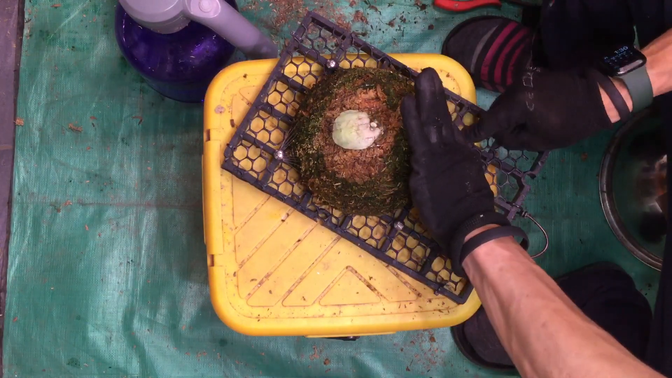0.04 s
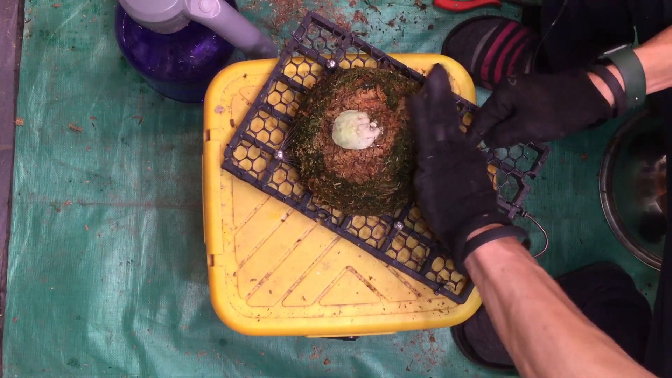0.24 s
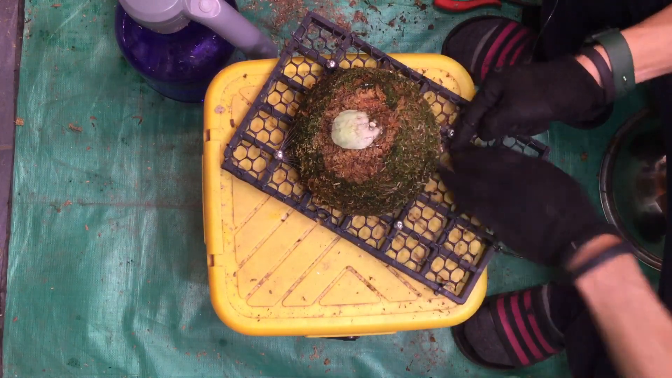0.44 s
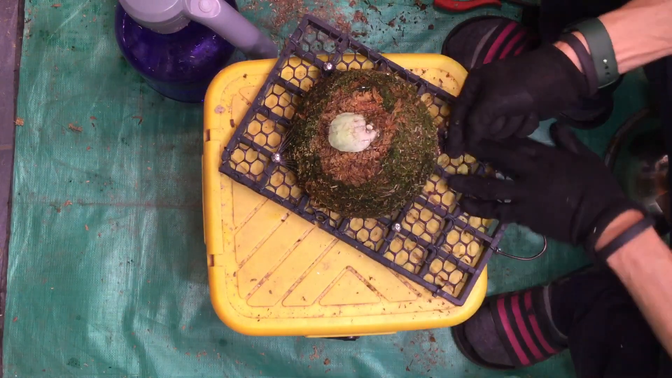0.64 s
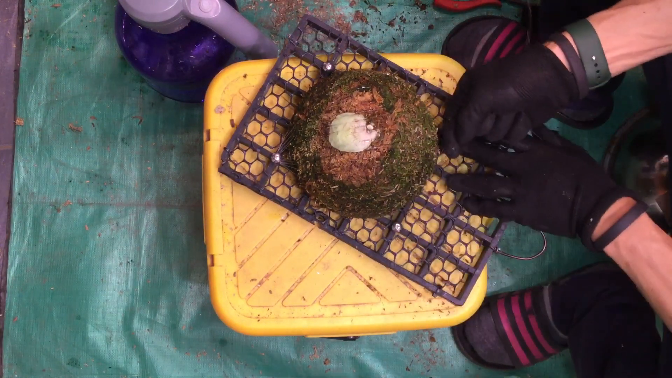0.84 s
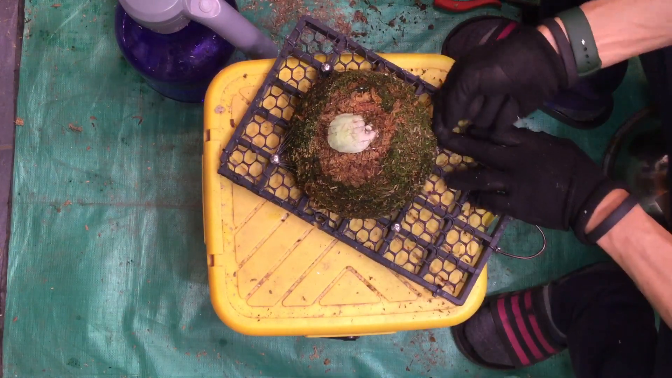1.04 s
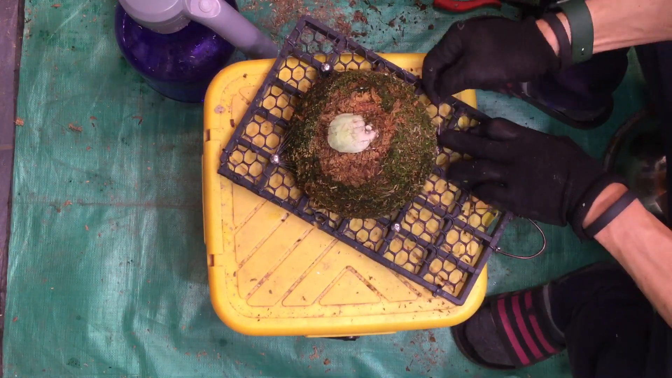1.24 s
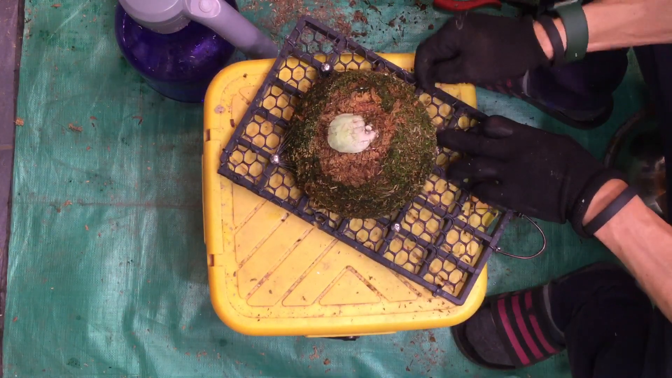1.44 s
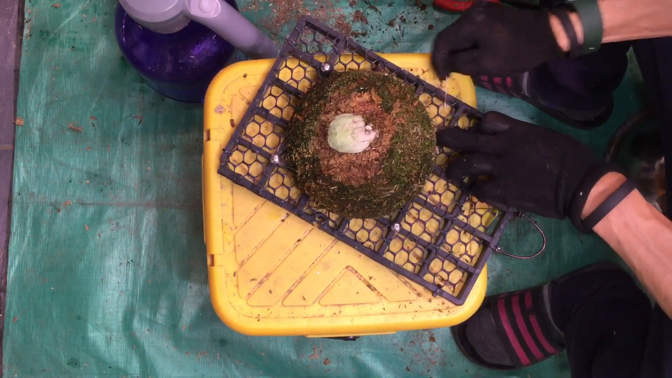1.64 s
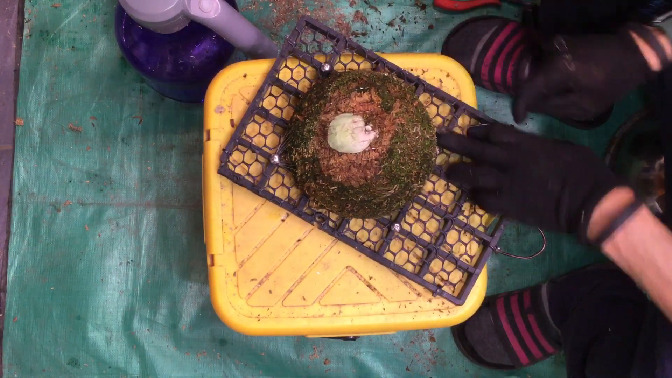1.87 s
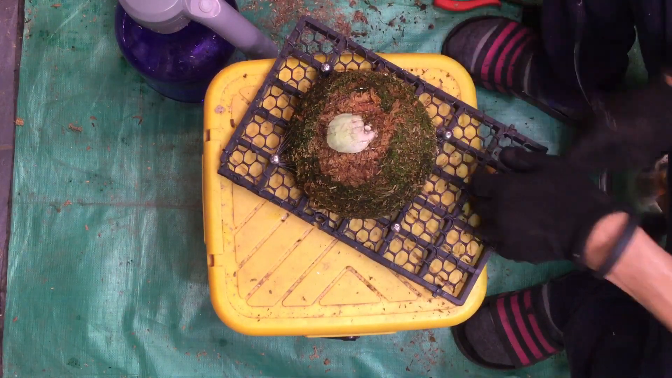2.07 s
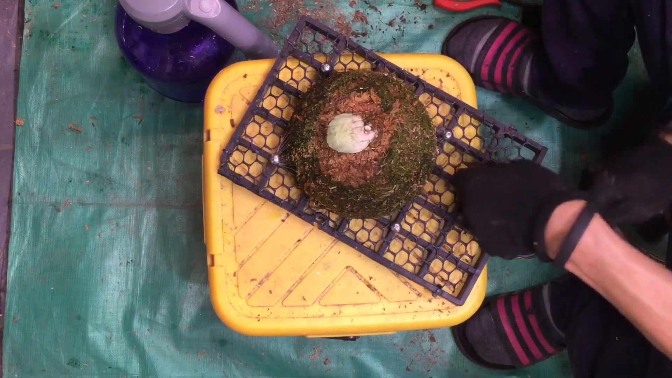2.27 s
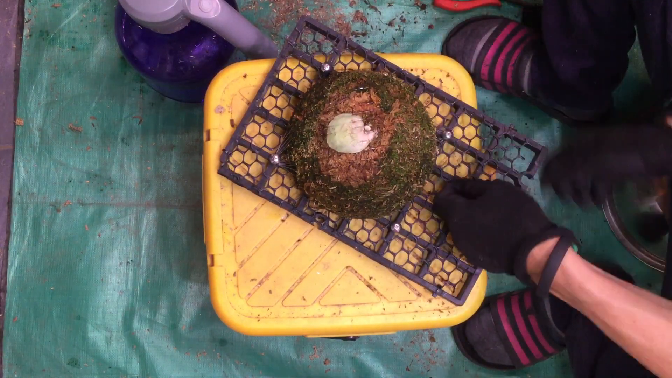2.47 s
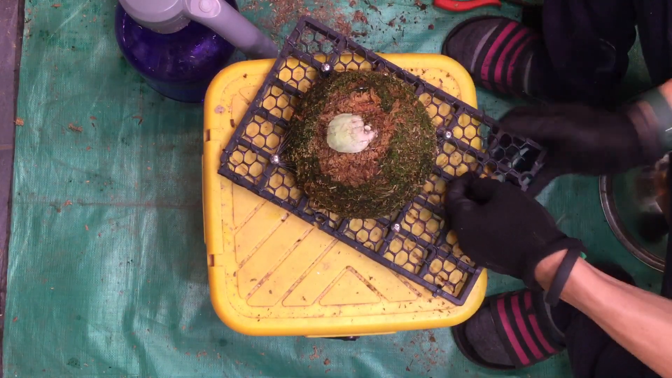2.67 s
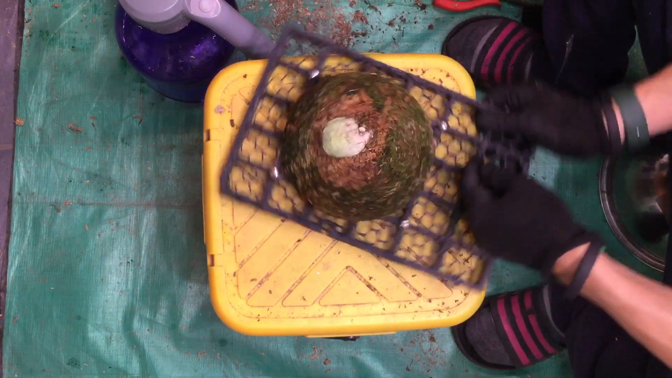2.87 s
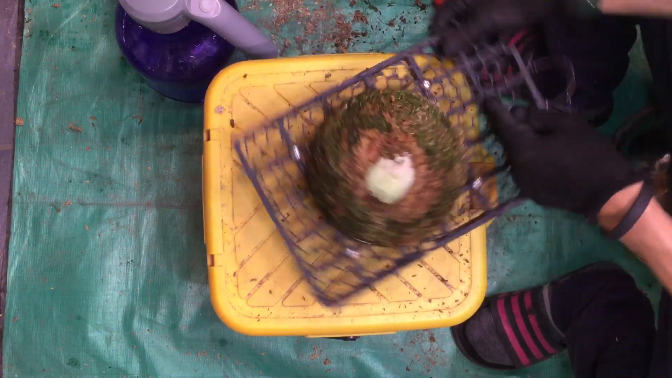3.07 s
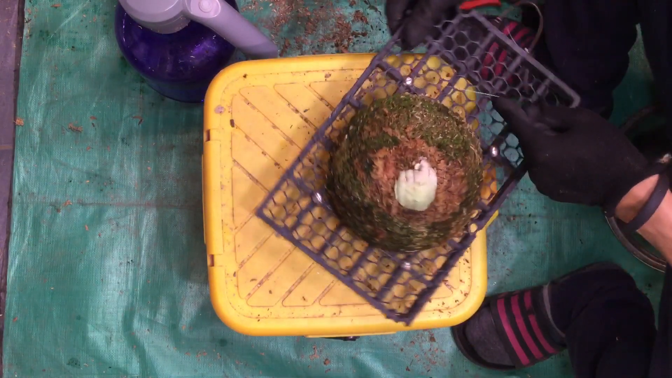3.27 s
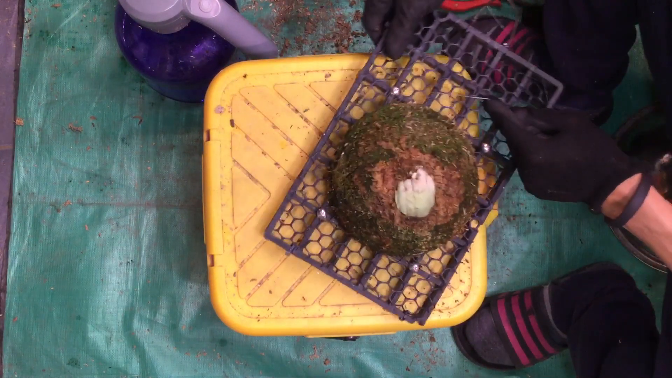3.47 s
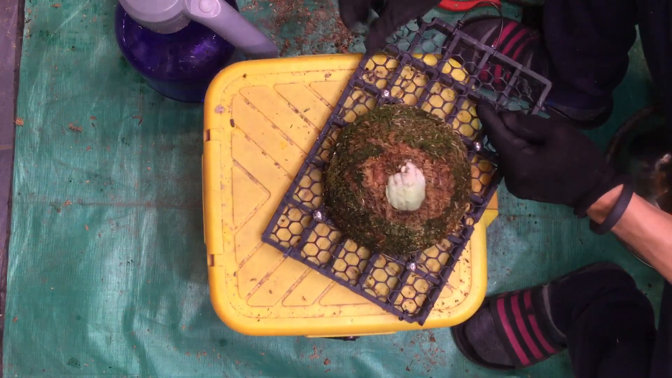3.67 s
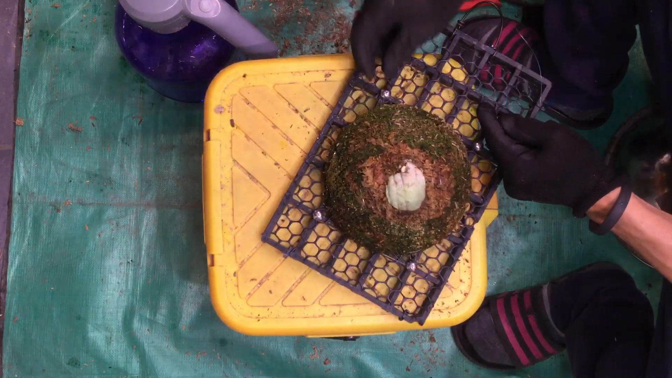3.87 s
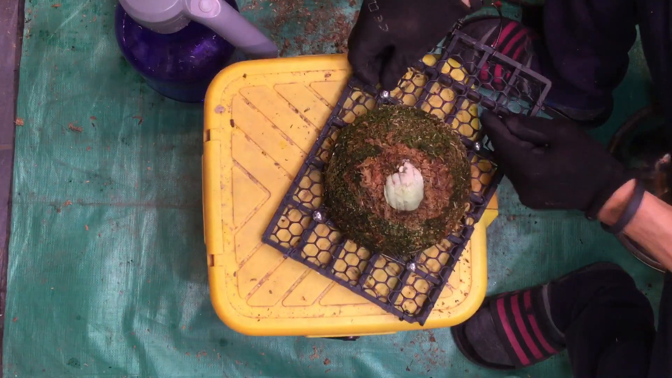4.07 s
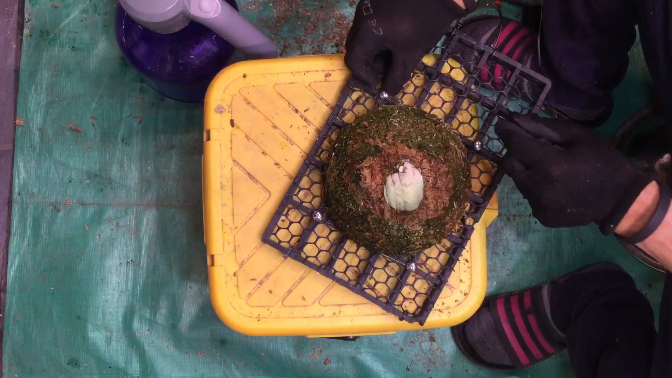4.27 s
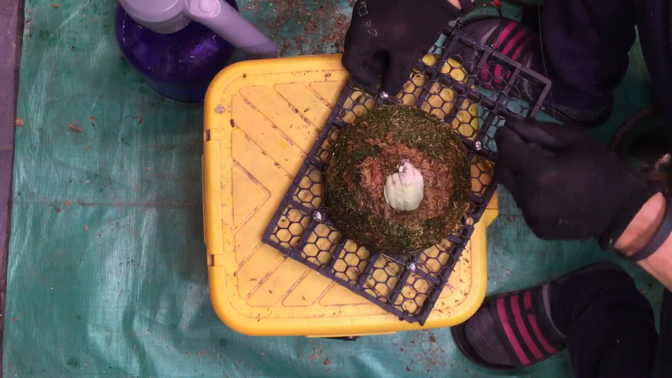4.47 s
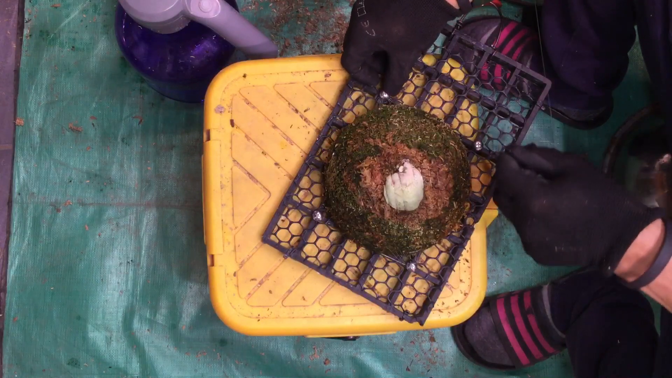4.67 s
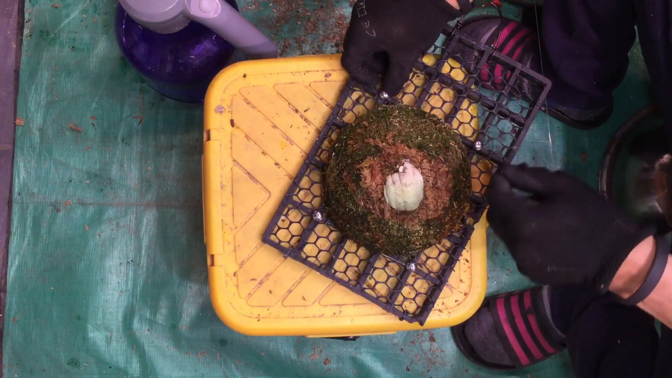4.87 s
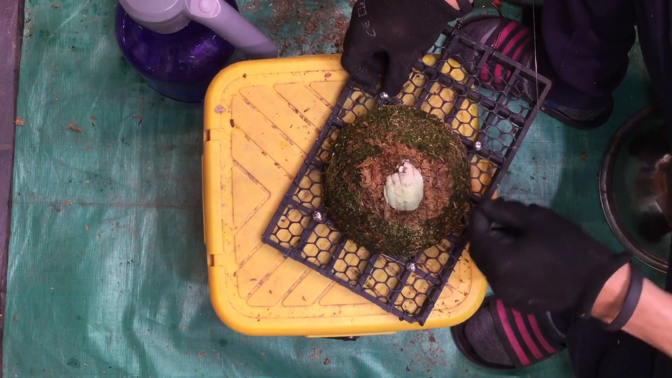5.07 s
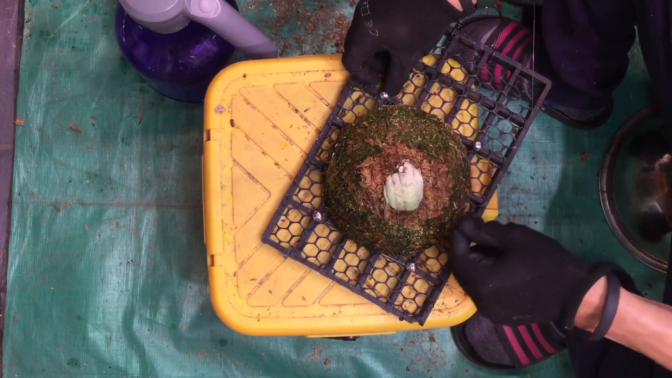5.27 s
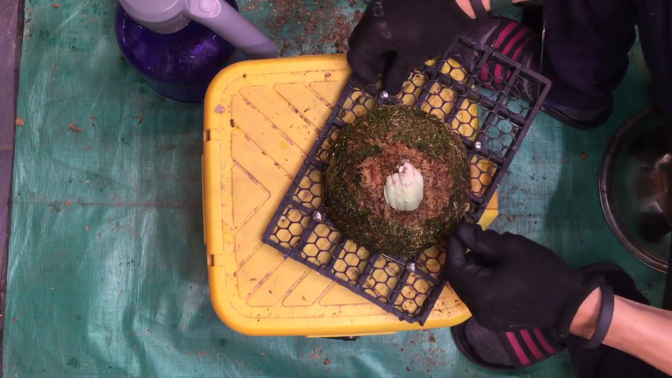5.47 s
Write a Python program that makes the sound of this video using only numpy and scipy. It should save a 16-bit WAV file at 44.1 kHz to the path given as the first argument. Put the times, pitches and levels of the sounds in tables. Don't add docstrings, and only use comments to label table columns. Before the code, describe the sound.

Close, dry recording in a small damped room. A plastic grid board rubs and bumps softly on a hollow tub lid, a few sharp clips click, then more light knocks and glove rubs follow. After three seconds come hard, boomy clunks as the board is turned and dropped, the heaviest at four seconds. One late click and tiny ticks remain over low ventilation rumble and wavering hum.

```python
import sys
import numpy as np
from scipy import signal
from scipy.fft import rfft, irfft
from scipy.io import wavfile

SR = 44100
rng = np.random.default_rng(int(sys.argv[2]) if len(sys.argv) > 2 else 0)


def level_to_linear(level):
    exponent = np.asarray(level, float) / 20
    return 10 ** exponent


def unload_audio(sound):
    columns = np.transpose(np.atleast_2d(sound))
    steps = np.round(np.clip(columns, -1, 1) * 32767)
    wavfile.write(sys.argv[1], SR, steps.astype(np.int16))


N = 242991

# (frequency [Hz], density [dB per Hz])
AIR_SPECTRUM = [(12, -59), (20, -17), (124, -1.5), (205, -1.5), (279, -10), (463, -9), (532, -16),
                (596, -12.5), (811, -20), (1070, -18.5), (1730, -25), (2420, -28.5), (7230, -42.5),
                (13800, -46), (16300, -47)]
# (frequency [Hz], width [Hz], level [dB rms])
DUCTS = [(587, 3.9, -67), (1079.6, 11.3, -69), (1350, 23, -71.5), (1567, 28, -79), (2417, 24, -77),
         (3487, 51, -83)]
# (time [s], level [dB])
HUM_SWELLS = [(.6, -63), (1.18, -59.5), (1.73, -68), (2.46, -54.5), (2.85, -52), (3.1, -52.5),
              (3.66, -45.5), (3.911, -50.5), (4.26, -56), (4.549, -49), (4.85, -49), (5.17, -54.5),
              (5.4, -51.5)]
AIR_DB, HUM_DB, HUM_HZ = -55.5, -64, 124.3
SWELL_RISE_S, SWELL_FALL_S = 0.21, 0.14

# (peak time [s], rise [s], fall [s], hiss level [dB])
GLOVE_STROKES = [(.238, .1, .03, -94), (.496, 0.041, .06, -87), (.608, 0.12, 0.19, -78.5),
                 (1.4, .2, 0.45, -103), (1.5, 0.049, 0.04, -71.5), (1.6, .2, .03, -89),
                 (1.874, 0.042, 0.064, -81.5), (2.028, 0.18, 0.028, -80), (2.474, 0.1, 0.063, -82),
                 (2.608, 0.078, 0.031, -78), (2.75, 0.068, 0.12, -84.5), (2.87, 0.11, .05, -92),
                 (2.91, 0.12, 0.059, -77.5), (3.09, 0.18, 0.18, -85), (3.582, 0.067, 0.16, -81.5)]
# (time [s], peak [dB])
GLOVE_TICKS = [(1.476, -65), (1.4875, -58), (1.6766, -56), (2.4618, -72), (2.7207, -64), (2.8689, -75),
               (3.5808, -62), (4.6942, -70), (4.7531, -63), (4.8953, -66), (4.9094, -67), (4.9352, -67),
               (4.9444, -64), (4.9736, -63), (5.021, -61), (5.0814, -65), (5.1098, -65), (5.1627, -70),
               (5.2415, -70), (5.4001, -68), (5.4834, -70)]
# (frequency [Hz], density [dB per Hz])
HISS_SPECTRUM = [(600, 11), (1200, 2.5), (3000, -2.5), (6000, -7), (10000, -12), (15500, -9), (16200, -44)]

# (peak time [s], rise [s], fall [s], level [dB])
DRAGS = [(.266, 0.085, 0.23, -55.5), (.45, .2, 0.11, -57), (.594, 0.11, 0.058, -37),
         (1.508, 0.043, 0.1, -43.5), (1.65, 0.13, 0.061, -43.5), (1.908, 0.28, .03, -49),
         (2.178, .22, 0.018, -48.5), (2.776, 0.023, 0.54, -39), (2.98, 0.78, 0.18, -49.5),
         (3.166, 0.14, .5, -49), (3.632, .14, .06, -39)]
# (time [s], main boom [dB], upper boom [dB rel], deep boom [dB rel])
LANDINGS = [
    (0.469, -37, -12, -1.5),
    (0.568, -44.5, -36, -28),
    (0.706, -35.5, -7, -21),
    (1.935, -33.5, -12, -9),
    (2.764, -40.5, -15, -16),
    (3.479, -18.5, -8, -48),
    (4.002, -24.5, -38, -3),
    (4.0143, -15.5, -16.5, -29),
    (4.109, -39, -7, -2.5),
]
# (time [s], main boom [dB], upper boom [dB rel], deep boom [dB rel])
PRESSES = [(0.722, -28, -38, -1), (2.008, -33, -3, -21), (2.046, -37.5, -7, -7), (2.581, -31, -15.5, -15),
           (2.604, -36.5, -24, -1), (3.497, -55, -25, -22), (3.609, -40, -10, -12), (3.671, -23, -6, -13),
           (3.685, -15.5, -10.5, -7), (3.717, -30.5, -22, 1), (3.746, -35, -12, 1),
           (4.006, -34.5, -19, 5.5), (4.082, -30.5, -11, -14)]
# (time [s], main boom [dB])
NUDGES = [(0.751, -44.5), (1.501, -42), (1.542, -47), (1.588, -53), (1.61, -44.5), (1.634, -44),
          (1.952, -46.5), (2.124, -46.5), (2.422, -50.5), (2.84, -39.5), (2.89, -41), (2.998, -43.5),
          (3.029, -43.5), (3.522, -36.5)]
NUDGE_UPPER_DB, NUDGE_DEEP_DB = -9, 0.5
FREE_RING, PRESSED_RING, NUDGED_RING = 0.73, 0.67, 1
# (frequency [Hz], level [dB], t60 [s])
LID_MAIN_MODES = [(177.8, 2.5, 0.14), (188, -11, 0.34), (171, -13, 0.23)]
# (frequency [Hz], level [dB], t60 [s])
LID_UPPER_MODES = [(274.7, -4.5, 0.35), (241, 10, 0.096), (313.5, 0, 0.2)]
# (frequency [Hz], level [dB], t60 [s])
LID_DEEP_MODES = [(110.8, 10.5, 0.17), (137, 13, 0.017), (66, -19, 0.87)]

# (time [s], body [dB], body pitch [Hz], edge [dB rel], snap [dB rel])
KNOCKS = [(0.298, -60, 1050, 0, 9), (0.467, -43, 620, -22, -27), (0.697, -41.5, 900, -21, -38),
          (0.701, -34, 663, -31, -40), (1.502, -48, 694, -14, -13), (1.874, -69, 1020, -22, -17),
          (2.004, -31, 1060, -14, -27), (2.03, -39.5, 680, -17, -28), (2.606, -54.5, 670, -20, 7.5),
          (3.4745, -23, 1300, -7.5, -11), (3.4768, -18, 857, -16, -45), (3.588, -54, 657, -2, -15),
          (3.67, -24.5, 670, -3.5, -33), (3.677, -21, 956, -32, -28), (3.699, -29, 705, -14.5, -35),
          (3.996, -47, 920, -7, -35), (4.005, -32, 1190, -19, -45), (4.011, -32.5, 695, -6, -21),
          (5.437, -54.5, 1090, -5, 3)]
# (time [s], body [dB], body pitch [Hz], edge [dB rel], snap [dB rel])
TAPS = [(0.697, -40, 1160, -29, -38), (1.929, -26, 1410, -9, -21), (1.938, -35, 1370, -37, 9),
        (1.955, -42, 1410, -18, -20), (2.907, -38, 1950, -32, -3), (2.911, -41.5, 1290, -9, -20),
        (3.124, -50, 1350, -32, 2.5), (3.492, -30, 1480, -31, -37), (3.667, -19, 1315, -12, -38),
        (4.018, -37.5, 1770, -16, -38), (4.029, -47, 1450, -8, -18), (4.083, -44, 1070, -5.5, -26),
        (2.912, -43, 660, -20, -30)]
GRID_MODES_HZ = np.geomspace(330, 2600, 26)
KNOCK_S, TAP_S = 0.0082, 0.0026
LEAD_S = 0.015

# (time [s], peak [dB], snap [dB rel], rattle [dB rel])
CLICKS = [
    (1.6076, -42, -17, -12.5),
    (1.6646, -55, -12, -7.5),
    (1.688, -33, -7, -9),
    (1.758, -31, -11, -8),
    (4.2089, -39.5, -14, -8.5),
]
# (frequency [Hz], level [dB], t60 [s])
CLICK_RATTLES = [
    [(6850, -4, 0.036), (2940, -5, .04), (1440, 5, 0.029)],
    [(2940, 6, 0.23), (4100, -5, .1)],
    [(3000, -5.5, 0.26), (3500, -15, .06), (1780, -11, 0.045), (3660, -2, 0.033), (5400, -13, 0.26),
     (6700, -10, 0.12), (8600, -6, 0.027)],
    [(3580, -1.5, 0.045), (1620, -11.5, 0.12), (2930, -5, 0.046), (4800, -23, 0.17), (6450, -7.5, 0.11),
     (8400, -27, 0.086)],
    [(4230, 3.5, 0.045), (5700, -4, 0.016), (3300, -6, 0.07)],
]

# (frequency [Hz], t60 [s])
ROOM_T60 = [(200, 0.27), (1000, 0.16), (4000, 0.14), (14000, 0.067)]
ROOM_DB = -7.5


def rms_one(x):
    return x / np.sqrt(np.mean(x ** 2) + 1e-20)


def peak_one(x):
    return x / abs(x).max()


def at_hz(points, hz):
    points_hz, values = np.array(points).T
    return np.interp(np.log(hz), np.log(points_hz), values)


def band(x, low_hz, high_hz):
    sos = signal.butter(2, [low_hz, min(high_hz, 0.45 * SR)], "band", fs=SR, output="sos")
    return signal.sosfilt(sos, x)


def drift(rate_hz):
    knots = rng.standard_normal(400)
    return np.interp(np.arange(N) / SR * rate_hz, np.arange(400), knots)


def coloured(spectrum, patchy_db):
    hz = np.maximum(np.fft.rfftfreq(N, 1 / SR), 10)
    shaped = rfft(rng.standard_normal(N)) * level_to_linear(at_hz(spectrum, hz))
    octave = np.log2(hz / 30)
    out = np.zeros(N)
    for k in range(-2, 11):
        share = np.clip(1 - abs(octave - k), 0, 1)
        out += level_to_linear(patchy_db * drift(18.0)) * irfft(shaped * share, N)
    return out


def gestures(rows):
    t = np.arange(0, N + 16, 16) / SR
    level = np.zeros(len(t))
    for s, rise_s, fall_s, peak_db in rows:
        level += level_to_linear(peak_db - 20 * np.maximum((s - t) / rise_s, (t - s) / fall_s))
    return np.interp(np.arange(N) / SR, t, level)


def ring(force, hz, t60_s):
    r = level_to_linear(-60 / (max(t60_s, 0.003) * SR))
    w = 2 * np.pi * hz / SR
    return signal.lfilter([0, np.sin(w)], [1, -2 * r * np.cos(w), r * r], force + 1e-18)


def strike(times_s, levels_db, freedom, modes):
    out = np.zeros(N + SR)
    t = np.arange(SR // 2) / SR
    for s, level_db, free in zip(times_s, levels_db, np.clip(freedom, 0.2, 3)):
        start = int(s * SR)
        for k, (hz, mode_db, t60_s) in enumerate(modes):
            wave = level_to_linear(level_db + mode_db - 60 * t / (t60_s * free)) * np.sin(2 * np.pi * hz * t)
            out[start:start + len(t)] += wave * (-1) ** k
    return out[:N]


def contact(grit, length_s, graze_db):
    t = np.arange(len(grit)) / SR - LEAD_S
    after = np.exp(-np.maximum(t, 0) / np.clip(length_s, 0.0002, 0.03)) * (t >= 0)
    before = level_to_linear(graze_db) * np.exp(np.minimum(t, 0) / 0.0085) * (t < 0)
    burst = grit * (after + before)
    burst[int(LEAD_S * SR) + 1] = 6.9
    return burst


def ventilation():
    air = coloured(AIR_SPECTRUM, patchy_db=0.6)
    air = signal.sosfilt(signal.cheby2(12, 40, 16000, fs=SR, output="sos"), air)
    out = level_to_linear(AIR_DB - 1.0) * air / np.std(band(air, 205, 16000))
    for hz, width_hz, level_db in DUCTS:
        t60_s = np.log(1000) / np.pi / width_hz
        waver = level_to_linear(level_db - 0.6 + 1.5 * drift(9.0))
        out += waver * rms_one(ring(rng.standard_normal(N), hz, t60_s))
    phase = 2 * np.pi * np.cumsum(HUM_HZ + 7.0 * drift(15.0)) / SR
    swells = gestures([(s, SWELL_RISE_S, SWELL_FALL_S, db) for s, db in HUM_SWELLS])
    load = level_to_linear(HUM_DB) + swells
    hum = level_to_linear(0.5) * load * level_to_linear(2.6 * drift(21.054)) * np.sin(phase)
    return out + hum


def gloves():
    catches = np.repeat(rng.exponential(1, N // 90 + 1), 90)[:N]
    slips = rng.exponential(1, N)
    grain = level_to_linear(1.3 * np.minimum(slips, 5) + 1.2 * np.minimum(catches, 4))
    hiss = coloured(HISS_SPECTRUM, patchy_db=1.0) * grain
    hiss = hiss / np.std(band(hiss, 7360, 14000))
    s, peak_db = np.transpose(GLOVE_TICKS)
    ticks = np.zeros(N)
    ticks[(s * SR).astype(int)] = level_to_linear(peak_db + 3)
    decay = np.exp(-1 / (0.002 * SR))
    smear = signal.lfilter([1], [1, -decay], ticks) * rng.standard_normal(N)
    return level_to_linear(7.0) * gestures(GLOVE_STROKES) * hiss + band(smear, 8900, 16000)


def lid():
    nudges = [(s, db, NUDGE_UPPER_DB, NUDGE_DEEP_DB) for s, db in NUDGES]
    heard_s, main_db, upper_db, deep_db = np.transpose(LANDINGS + PRESSES + nudges)
    counts = [len(LANDINGS), len(PRESSES), len(NUDGES)]
    freedom = np.repeat([FREE_RING, PRESSED_RING, NUDGED_RING], counts)
    push_s = heard_s - 0.004
    boom = strike(push_s, main_db + 0.5, freedom, LID_MAIN_MODES)
    boom += strike(push_s, main_db + upper_db - 3, freedom, LID_UPPER_MODES)
    deep = strike(push_s, main_db + deep_db - 9, freedom, LID_DEEP_MODES)
    drag = np.zeros(N)
    for hz, db, t60_s in LID_MAIN_MODES:
        drag += level_to_linear(db) * ring(rng.standard_normal(N), hz, t60_s)
    drag = level_to_linear(-5.0) * gestures(DRAGS) * rms_one(drag)
    return band(boom, 89, 670) + band(deep, 34, 183) + drag


def grid():
    hits = [(*row, KNOCK_S) for row in KNOCKS] + [(*row, TAP_S) for row in TAPS]
    size = (len(hits), 4000)
    grit = rng.standard_normal(size) * level_to_linear(2.0 * rng.standard_normal(size))
    coupling = rng.standard_normal((len(hits), len(GRID_MODES_HZ)))
    sounds = []
    for row, pull, (s, body_db, body_hz, edge_db, snap_db, length_s) in zip(grit, coupling, hits):
        gains = pull * level_to_linear(-24 * np.log2(GRID_MODES_HZ / body_hz) ** 2)
        touch = contact(row, 0.52 * length_s, -56)
        side_modes = sum(g * ring(touch, hz, 16 / hz) for g, hz in zip(gains, GRID_MODES_HZ))
        firm = contact(0.033 * row, 0.23 * length_s, -60)
        main_mode = ring(firm, body_hz, 16 / body_hz)
        body = peak_one(main_mode) + level_to_linear(-10) * peak_one(side_modes)
        body = signal.sosfilt(signal.butter(2, 2800, fs=SR, output="sos"), body)
        burst = contact(row, length_s, -17.5)
        edge = level_to_linear(edge_db + 4.5) * peak_one(band(burst, 1600, 4000))
        snap = level_to_linear(snap_db - 3) * peak_one(band(burst, 4200, 11500))
        sounds.append((s - LEAD_S, level_to_linear(body_db) * (peak_one(body) + edge + snap)))
    return sounds


def clip_clicks():
    sounds = []
    grit = rng.standard_normal((len(CLICKS), 5500))
    for row, (s, peak_db, snap_db, rattle_db), modes in zip(grit, CLICKS, CLICK_RATTLES):
        crack = peak_one(band(contact(row, 0.002, -24), 1200, 8000))
        rattle = np.zeros(len(row))
        for hz, db, t60_s in modes:
            rattle += level_to_linear(db) * peak_one(ring(contact(row, t60_s / 7, -26), hz, 0.008))
        snap = level_to_linear(snap_db + 1) * peak_one(band(contact(row, 0.0038, -32), 8300, 13300))
        sounds.append((s - LEAD_S, level_to_linear(peak_db + 3.5) * (crack + level_to_linear(rattle_db) * rattle + snap)))
    return sounds


def room(sounds):
    out = np.zeros(N + SR)
    t = np.arange(int(0.3 * SR)) / SR
    edges_hz = 250 * 2 ** np.arange(0, 6.6, 0.5)
    fields = [band(rng.standard_normal(SR), lo, hi) for lo, hi in zip(edges_hz, edges_hz[1:])]
    decays = [level_to_linear(-60 * t / at_hz(ROOM_T60, lo)) for lo in edges_hz]
    for s, sound in sounds:
        pick = int(s * 5000)
        tail = sum(f[pick:pick + len(t)] * d for f, d in zip(fields, decays))
        tail *= np.clip((t - 0.003) / 0.00087, 0, 1)
        wet = level_to_linear(ROOM_DB) * signal.fftconvolve(sound, tail / np.sqrt(np.sum(tail ** 2)))
        wet[:len(sound)] += sound
        start = int(s * SR)
        out[start:start + len(wet)] += wet
    return out[:N]


def scene():
    return (ventilation() + gloves() + lid() + room(grid() + clip_clicks()))[None]


def low_pass(x):
    return signal.sosfilt(signal.butter(12, 16460, fs=SR, output="sos"), x)


def record(dry):
    thin = signal.sosfilt(signal.butter(4, 44, "high", fs=SR, output="sos"), dry)
    mix = signal.sosfilt(signal.cheby2(14, 60, 16500, fs=SR, output="sos"), thin)
    return low_pass(mix)


dry = scene()
out = record(dry)
unload_audio(out)
```